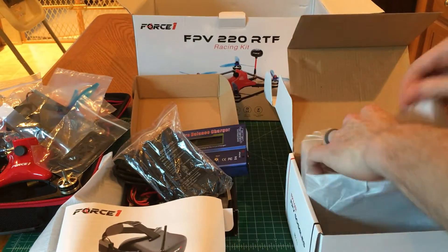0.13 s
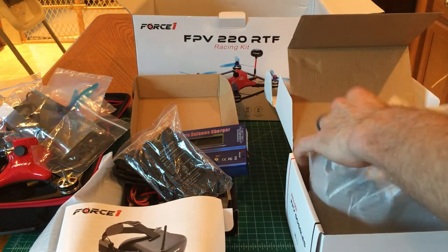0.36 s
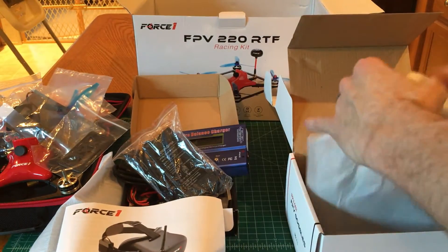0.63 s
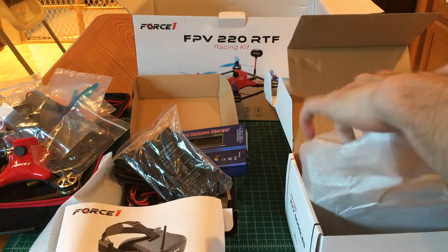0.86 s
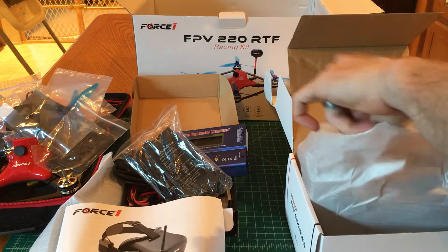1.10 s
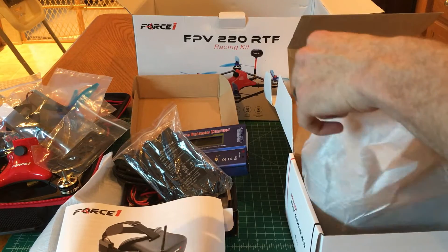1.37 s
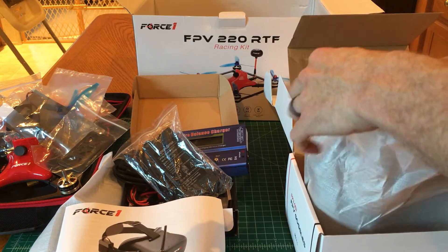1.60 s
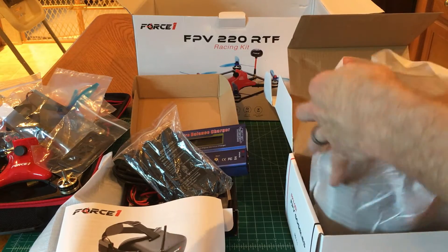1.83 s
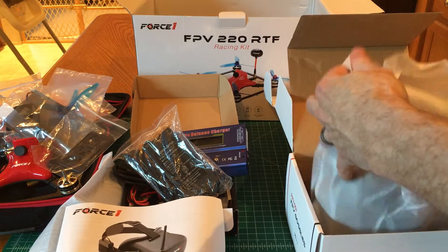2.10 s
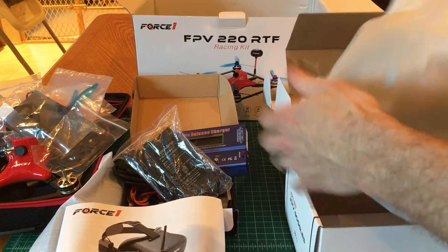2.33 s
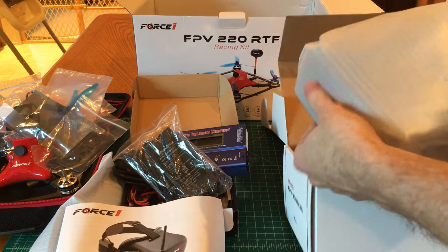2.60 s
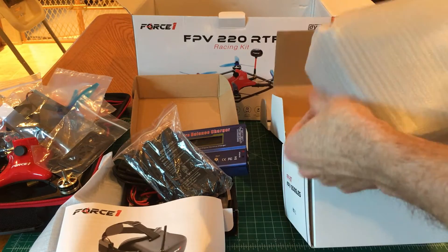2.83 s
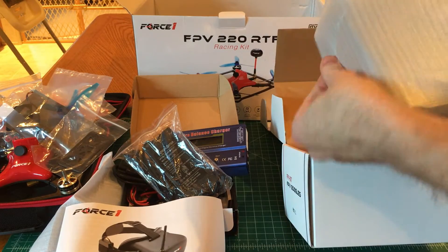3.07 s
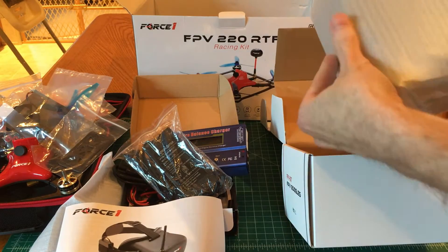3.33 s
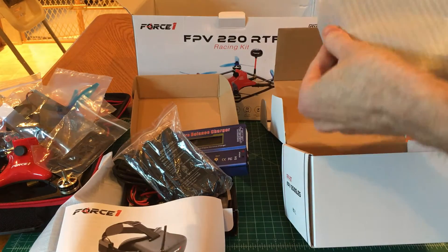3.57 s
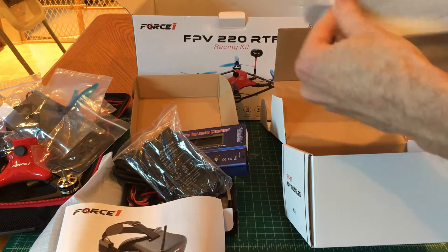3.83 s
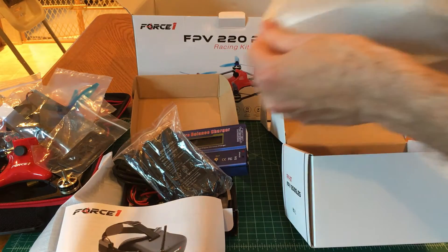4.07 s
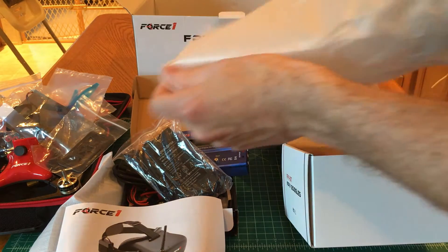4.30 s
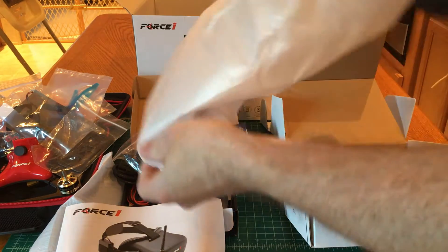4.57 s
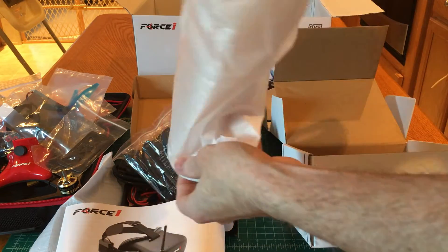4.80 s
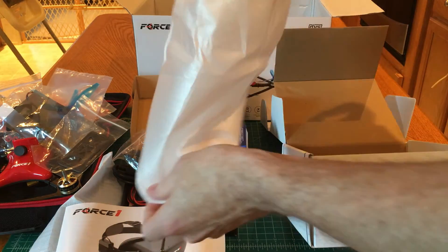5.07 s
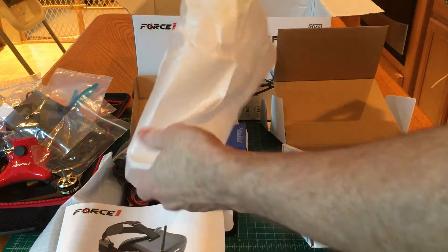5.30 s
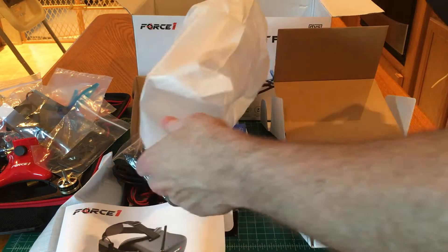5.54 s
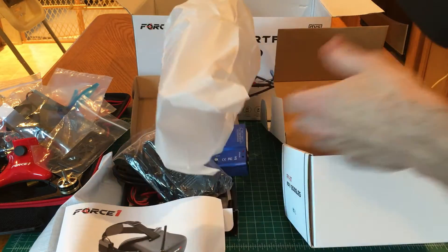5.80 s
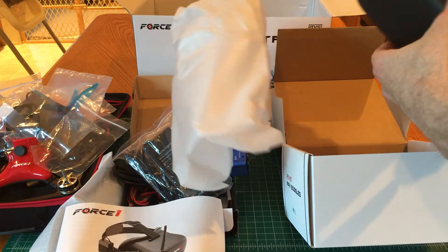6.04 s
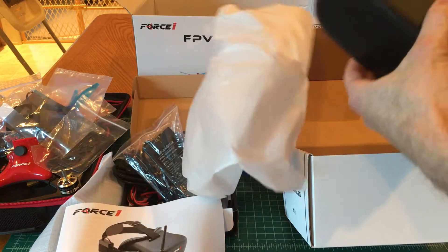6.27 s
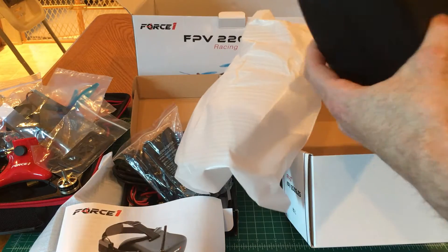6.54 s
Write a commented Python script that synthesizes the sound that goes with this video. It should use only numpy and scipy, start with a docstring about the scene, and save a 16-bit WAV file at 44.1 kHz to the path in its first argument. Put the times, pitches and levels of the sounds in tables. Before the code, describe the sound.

A quiet small room with a low steady hum and soft murmur, heard through one close microphone with a short dull echo. From 0 to 2.3 s, hands rub thin foam wrapping in short, gritty, airy strokes of about a tenth to a quarter second, with small crease pops and muffled cardboard bumps. After a brief lull, a pop and light knock come at 2.4 s, then at about 2.7 s the box drops on the table with a loud hollow double knock, rattling and tapping quickly to rest by 2.9 s. Gentler rustles continue. From 3.9 s they strengthen, peaking near 4.1 s with a sharp, loud crease snap, a knock and a fuller swish lasting to 4.5 s. Then only short faint rubs and tiny ticks remain, nearly silent around 5.6 to 6 s, with a small cluster of crinkles near 6.2 to 6.3 s and a last tick at 6.6 s.

```python
"""A thin foam sheet slides under the hands in short strokes and its creases pop, close to a single microphone.
The hands are lifting an object wrapped in the sheet from a cardboard box in a quiet room, over a hum and a low murmur.
The sheet is gritty noise in drifting bands, a pop is a sagging tone with a crack, and rubs and knocks ring
the box's modes as it drops back on the table and rocks. The hum is wavering sines; the walls add a dull noise-tail echo."""
import sys
import numpy as np
from scipy import signal
from scipy.fft import rfft, irfft, next_fast_len
from scipy.io import wavfile
from scipy.ndimage import uniform_filter1d

SR = 44100
rng = np.random.default_rng(int(sys.argv[2]) if len(sys.argv) > 2 else 0)


def log_audio(samples):
    """Write samples as a 16-bit WAV file to the path given in sys.argv[1]."""
    # one column per channel
    frames = np.atleast_2d(samples).T
    # limit to full scale, then quantise
    limited = np.clip(frames, -1, 1)
    pcm = np.round(limited * 32767).astype(np.int16)
    wavfile.write(sys.argv[1], SR, pcm)


def makeup_ratio(level_db):
    """Linear amplitude ratio for a level in decibels (20 dB per factor of ten)."""
    decades = np.asarray(level_db, float) / 20
    return 10 ** decades


N = 293526
T = np.arange(N) / SR

# strokes of the sliding sheet: (start t/s, length/s, starting level/dB, sag over the stroke/dB,
# sheen level against the stroke/dB)
SHEET_STROKES = [(0, 0.017, -44.5, -3, -9), (0.107, 0.09, -35.5, 9.5, -6.5), (0.211, 0.16, -35, 0.7, -6),
                 (0.436, 0.24, -37.5, 1, -6.5), (0.72, 0.083, -39, 5.5, -4.5),
                 (0.887, 0.208, -36.5, 0, -4.5), (1.132, 0.17, -41.5, 0.5, -1),
                 (1.344, 0.05, -49.5, -6, -5), (1.405, 0.03, -48, 2, -4), (1.547, 0.011, -38.5, 15, -18),
                 (1.578, 0.07, -40.5, 2, -6), (1.72, 0.13, -47, -5.5, -4.4), (1.883, 0.27, -38.5, 4, -8),
                 (2.199, 0.11, -36, 16.5, -5), (2.297, 0.032, -53.5, -1, -4),
                 (2.387, 0.0082, -47.5, -6.5, -5), (2.467, 0.025, -45, -11.5, -9.5),
                 (2.585, 0.058, -40, 5, -5), (2.669, 0.11, -46, -6, -2), (2.902, 0.052, -42, -4.5, -6),
                 (3.007, 0.11, -43.5, -0.5, 0.5), (3.126, 0.12, -45, -3.8, -10),
                 (3.34, 0.11, -37.5, 3.9, -4), (3.661, 0.093, -45, -7, -9), (3.785, 0.056, -38, -8, -9),
                 (3.901, 0.044, -34, -3.5, -4), (4.022, 0.065, -32, -0.5, -8),
                 (4.077, 0.24, -28.5, 4.5, -6), (4.352, 0.18, -40.0, 7, -2.5), (4.577, 0.1, -48.5, 0.3, -6),
                 (4.74, 0.015, -51, 6, -10), (4.782, 0.018, -49, 5, -10), (4.859, 0.01, -46, 20, -6),
                 (4.925, 0.03, -57, -8.5, -4.8), (5.027, 0.023, -45, 4.5, -1.5), (5.221, 0.072, -47, 1, -3),
                 (5.391, 0.0099, -45.5, -1.5, -7), (5.61, 0.08, -62.5, -1, -12), (6.135, 0.008, -60, 9, -6),
                 (6.164, 0.065, -57, -6, -7), (6.26, 0.015, -47.9, 10, -7), (6.296, 0.067, -63.5, -6.6, -8),
                 (6.43, 0.041, -50, 3, -5), (6.558, 0.073, -65.5, -12, -9)]
# the sheet resting in the hands between strokes: (t/s, level/dB)
RESTING_CONTACT = [(0, -50), (1.2, -42.5), (1.5, -46.5), (2.3, -62), (2.36, -66), (2.55, -49.5), (3.3, -48),
                   (3.62, -51.5), (4.72, -60), (4.9, -56.5), (5.15, -54.5), (5.5, -58), (5.58, -64),
                   (5.9, -67), (6.1, -63.5), (6.3, -60.5), (6.66, -64)]
# spectrum of the sheet as the microphone hears it, with the microphone's dips near 2.9, 5 and 10.4 kHz,
# relative within each of its four bands: (f/Hz, density/dB)
SHEET_SPECTRUM = [(240, -44), (500, -5), (800, -6.5), (1200, -3.5), (2400, -1.5), (2900, -14), (4440, -8),
                  (5000, -11), (6400, 3.5), (7600, 1), (8600, 2.5), (9900, -1.5), (10400, -5.5),
                  (11200, -0.5), (16000, -5.5)]
# the sheet's two lower bands against the rubbing level, before firmness: (t/s, body level/dB, fold level/dB)
LOW_BANDS = [(0, -2, -6), (.3, -5, -6.5), (.6, -4.5, -5.5), (.9, -6.5, -8), (1.25, -8.5, -7.5),
             (1.4, -5, -7), (1.9, -4.5, -5.5), (2.4, -6, -6), (2.75, -5, -5.5), (3.1, -8, -8.5),
             (3.42, -4, -7.5), (3.9, -6.5, -6.5), (4.2, -1.5, -7), (4.6, -7, -7), (5.05, -7.5, -7.5),
             (5.4, -8, -6), (5.55, -8, -9.5), (6.0, -8, -8.5), (6.3, -5.5, -5), (6.66, -8, -7.5)]
# hands and load shuffling against the box, before a 1.5 dB trim: (t/s, level/dB)
BOX_SHUFFLE = [(0.0, -46), (0.81, -50), (1.04, -49), (1.32, -52), (1.83, -48.5), (2.45, -52.5), (2.65, -50),
               (2.98, -58), (3.87, -50.5), (4.23, -39), (4.39, -46), (4.67, -57.5), (4.87, -57),
               (5.04, -54.5), (5.69, -52.5), (5.84, -54.5), (6.32, -58), (6.66, -56.5)]
# cardboard walls as ringing modes, as struck; shuffling halves the t60: (f/Hz, relative level/dB, t60/s)
BOX_MODES = [(92, -9, 0.14), (172, -9.5, 0.19), (230, -9.5, 0.11), (301, 0.5, 0.062), (357.4, 0, 0.054),
             (437, -2, 0.045), (556, -9.5, 0.045), (636, -3.5, 0.095), (722, -0.5, 0.054), (896, 5, 0.027),
             (1110, 4.5, 0.042), (1266, 0.5, 0.036), (1340, -4, 0.028), (1710, -4, .04), (2120, -2, 0.056),
             (3270, -2, 0.026)]
# relative spectrum of the room's murmur: (f/Hz, density/dB)
ROOM_SPECTRUM = [(18, -37), (30, -7), (59, 3), (124, -5.5), (233, 0), (404, -14.5), (1190, -22.5),
                 (1320, -37), (2480, -32.5), (2900, -42), (3400, -31), (9220, -48.5), (16000, -47)]
# lines of the hum, before a 3.5 dB lift: (f/Hz, level/dB)
HUM_LINES = [(59.2, -57.5), (177.6, -60.5), (231.5, -61), (1174, -76), (1464, -84), (1933, -76.5),
             (2460, -75.5), (2519, -86)]
# creases popping: (t/s, patch peak level/dB, nominal f/Hz, crack peak against patch/dB, ring t60/s)
CREASE_POPS = [(.018, -27, 1620, -2, 0.035), (.1165, -36, 1460, -5, .02), (.3685, -25, 2160, -9, 0.016),
               (0.595, -25, 1856, -18, 0.04), (0.6009, -23, 1430, -22, 0.021), (.728, -28, 2160, -8, .014),
               (.7765, -24.5, 1670, -8, 0.017), (1.615, -34, 1130, -10, 0.024),
               (2.3986, -23.5, 1830, -3.5, 0.016), (2.496, -26, 1504, -12.5, 0.048),
               (2.6775, -22, 2350, -7, 0.016), (2.7015, -38, 2260, -10, .013),
               (3.9152, -29.5, 1740, -3, 0.022), (4.069, -24, 2080, -20, .0115),
               (4.072, -11.5, 1086, 7, 0.031), (4.0715, -12, 2250, -20, 0.014),
               (4.1763, -26.5, 990, -6, 0.018), (4.247, -24, 2307, 4.5, .015), (4.33, -30, 970, -8, 0.032),
               (5.275, -40, 2310, -20, .041), (5.288, -37, 2310, -20, 0.027), (5.385, -42, 2600, 2, .015),
               (5.4032, -36, 2220, -2, .015), (5.4903, -42, 1900, 0, .015), (6.066, -55, 3000, 9, .015),
               (6.2055, -39, 1110, -8, .018), (6.215, -38, 1860, -1, 0.024), (6.253, -38, 1710, -1, 0.019),
               (6.282, -43, 10500, -20, .02), (6.3, -35, 1800, 0, 0.018), (6.611, -37.5, 3950, -8, 0.018)]
# blows on the box: (t/s, peak level/dB, most stirred f/Hz, focus/dB per octave, rattle decay to 1/e /ms)
BOX_KNOCKS = [(.11, -38, 229, 10, 4.7), (.224, -31.5, 331, 13, 3.3), (.502, -38, 326, 18, 2.9),
              (.603, -25.5, 367, 9, 1.7), (.73, -30, 383, 9, 4.2), (.777, -32.5, 318, 10, 9.1),
              (.987, -27, 230, 5.5, 2.2), (1.384, -34.5, 304, 22, 3.3), (1.611, -28, 260, 7, 2.2),
              (2.006, -33, 229, 12, 3.3), (2.323, -35, 304, 6, 3.4), (2.384, -32, 300, 5, 3.5),
              (2.399, -22, 440, 36, 1), (2.493, -30, 250, 15, 3.7), (2.678, -11.5, 495, 4.5, 9.8),
              (2.703, -15.5, 704, 6, 5.3), (2.721, -20, 900, 2.5, 14), (4.078, -19.5, 307, 1.5, 1.66),
              (4.33, -29, 740, 8, 5.2), (5.429, -40, 231, 2.5, 1.4), (6.257, -37.5, 300, 8, 2.5),
              (6.3, -34, 700, 10, 1.1)]

# sheet: body lies below the first edge, then fold, the main band, and sheen above the last
BODY_BELOW_HZ, FOLD_BELOW_HZ, SHEEN_ABOVE_HZ = 2850, 5000, 10500
RISE_DB_PER_S, FALL_DB_PER_S, REST_SHEEN_DB = 613, 257, -6
# gentler rubbing is duller: body and fold recede per dB of rubbing above FIRM_DB
FIRM_DB, BODY_PER_DB, FOLD_PER_DB = -46, 0.4059, 0.18
ECHO_T60_S, ECHO_DB, ECHO_TOP_HZ = 0.41, -16, 4800
# cracks harder than SHARP_ABOVE_DB decay faster than CRACK_MS
CRACK_MS, SHARP_ABOVE_DB = 2, -18
# after the drop the box rocks to rest: each tap is weaker, and lower until ROCK_LOW_HZ
ROCK_S, ROCK_GAP_S, ROCK_DB, ROCK_DB_PER_TAP = 2.745, .023, -30, 1.7
ROCK_HZ, ROCK_LOW_HZ, ROCK_OCTAVES_PER_TAP = 900, 440, 0.56
ROCK_FOCUS_DB, ROCK_MS = 23, 7.7  # focus per octave
TOP_HZ = 15720  # upper edge of the microphone's range


def unit(x):
    """Scale to rms 1."""
    return x / np.sqrt(np.mean(x ** 2))


def colour(x, points):
    """Shape a noise by (Hz, dB) points, joined along log frequency."""
    hz, db = np.transpose(points)
    bins = np.arange(N // 2 + 1) * SR / N + 1
    gain_db = np.interp(np.log(bins), np.log(hz), db)
    return irfft(rfft(x) * makeup_ratio(gain_db), N)


def cut(x, hz, kind):
    """Steep low-, high- or band-pass."""
    return signal.sosfilt(signal.butter(4, hz, kind, fs=SR, output="sos"), x)


def ring(hz, t60, size=6000):
    """One mode dying away by 60 dB in t60 seconds."""
    t = np.arange(size) / SR
    return np.sin(2 * np.pi * hz * t) * np.exp(-np.log(1000) * t / t60)


def add(out, s, sound):
    """Mix a sound in at time s."""
    i = int(s * SR)
    out[i:i + len(sound)] += sound[:N - i]


def walk(rate):
    """Random levels held 1 / rate seconds and slewed twice; rms 1."""
    k = int(SR / rate)
    held = np.repeat(rng.standard_normal(N // k + 1), k)
    slewed = uniform_filter1d(uniform_filter1d(held, k), k)
    return unit(slewed[:N])


def grit(share, spread_db, grit_db):
    """Smooth rubbing plus scattered cells that catch and let go with uneven strength, a few somewhat harder."""
    caught = rng.random(N) < share
    strength = makeup_ratio(spread_db * rng.exponential(size=N))
    catches = caught * strength * rng.standard_normal(N)
    return unit(rng.standard_normal(N) + makeup_ratio(grit_db) * unit(catches))


def strokes():
    """Level and sheen of the rubbing: strokes share one rise and fall rate, over the resting contact."""
    power = makeup_ratio(2 * np.interp(T, *np.transpose(RESTING_CONTACT)))
    sheen = power * REST_SHEEN_DB
    for s, length, db, sag_db, sheen_db in SHEET_STROKES:
        level_db = db - sag_db * np.clip((T - s) / length, 0, 1)
        level_db -= RISE_DB_PER_S * np.clip(s - T, 0, 1)
        level_db -= FALL_DB_PER_S * np.clip(T - s - length, 0, 1)
        stroke = makeup_ratio(2 * level_db)  # power
        power = power + stroke
        sheen = sheen + stroke * sheen_db
    return 10 * np.log10(power), sheen / power


def patches(rub, flicker_db, crackle_db):
    """Patches of film come and go under the fingers: quarter-octave bands swell and crackle on their own."""
    size = next_fast_len(N)
    step = 4 * np.log2((np.arange(size // 2 + 1) * SR / size + 1) / 200)  # quarter octaves above 200 Hz
    out = np.zeros(N)
    for k in range(27):
        ticks = unit((rng.random(N) < .008) * rng.standard_normal(N))
        window = np.cos(np.pi / 2 * np.clip(step - k, -1, 1)) ** 2  # neighbours overlap and sum to one
        band = irfft(rfft(rub + makeup_ratio(crackle_db) * ticks, size) * window, size)[:N]
        out += makeup_ratio(flicker_db * walk(14)) * band
    return out


def sheet():
    """Stick-slip rubbing of foam film; body and fold recede as the grip firms, sheen changes with each stroke."""
    db, sheen_db = strokes()
    s, body_db, fold_db = np.transpose(LOW_BANDS)
    body_db = np.interp(T, s, body_db) - BODY_PER_DB * (db - FIRM_DB)
    fold_db = np.interp(T, s, fold_db) - FOLD_PER_DB * (db - FIRM_DB)
    rub = grit(share=.03, spread_db=1.5, grit_db=-6.5)
    rub = rub * makeup_ratio(1.3 * walk(60) + 0.68 * walk(25.12))
    rub = colour(patches(rub, flicker_db=1.1, crackle_db=-7.5), SHEET_SPECTRUM)
    body = makeup_ratio(body_db) * unit(cut(rub, BODY_BELOW_HZ, "low"))
    fold = makeup_ratio(fold_db) * unit(cut(rub, (BODY_BELOW_HZ, FOLD_BELOW_HZ), "band"))
    main = makeup_ratio(-4.5) * unit(cut(rub, (FOLD_BELOW_HZ, SHEEN_ABOVE_HZ), "band"))
    sheen = makeup_ratio(sheen_db) * unit(cut(rub, SHEEN_ABOVE_HZ, "high"))
    return makeup_ratio(db) * (body + fold + main + sheen)


def shuffling():
    """Hands and load bump along the cardboard and ring its modes, which die twice as fast as when struck."""
    walls = sum(makeup_ratio(db) * ring(hz, t60 * 0.5) for hz, db, t60 in BOX_MODES)
    bumps = cut(grit(share=.004, spread_db=2.5, grit_db=-3.0), 535, "low")
    rubbed = unit(signal.fftconvolve(bumps, walls)[:N])
    s, db = np.transpose(BOX_SHUFFLE)
    return makeup_ratio(np.interp(T, s, db) - 1.5) * rubbed


def murmur():
    """Low coloured noise of the room that swells a little."""
    noise = unit(colour(rng.standard_normal(N), ROOM_SPECTRUM))
    return makeup_ratio(-50.5 + 1.2 * walk(2.65)) * noise


def hum():
    """Appliance motor as steady lines that waver in level and slightly in pitch."""
    out = np.zeros(N)
    for hz, db in HUM_LINES:
        level = makeup_ratio(db + 3.5 + 1.94 * walk(5))
        wavering_time = np.cumsum(1 + .004 * walk(4)) / SR
        out += level * np.sin(2 * np.pi * hz * wavering_time)
    return out


def echo(x):
    """Dense, dull reflections from the walls that start after 4 ms and die away."""
    t = np.arange(int(1.3 * ECHO_T60_S * SR)) / SR
    tail = cut(rng.standard_normal(len(t)), ECHO_TOP_HZ, "low")
    tail = tail * np.exp(-np.log(1000) * t / ECHO_T60_S) * (t > .004)
    tail = tail / np.sqrt(np.sum(tail ** 2))
    return makeup_ratio(ECHO_DB) * signal.fftconvolve(x, tail)[:N]


def pops():
    """A buckling crease rings a patch of film whose pitch sags as it slackens, and cracks broadly."""
    out = np.zeros(N)
    t = np.arange(1500) / SR
    for s, db, hz, crack_db, t60 in CREASE_POPS:
        noise = rng.standard_normal(len(t))
        # pitch sags within a few cycles from about 1.27 to 0.835 of nominal
        turns = 0.835 * hz * t + 1.31 * (1 - np.exp(-hz * t / 3.0))
        fade = (1 - np.exp(-t / .0003)) * np.exp(-np.log(1000) * t / t60)
        rough = unit(cut(noise, (hz * 0.33, hz * 1.73), "band"))
        patch = fade * (np.sin(2 * np.pi * turns) + 0.46 * rough)
        ms = CRACK_MS * makeup_ratio(-0.8 * max(db + crack_db - SHARP_ABOVE_DB, 0))
        crack = (noise + 2.9 * (t == 0)) * np.exp(-1000 * t / max(ms, .1))  # led by one sharp edge
        crack = cut(crack, (4000, 11500), "band")
        add(out, s, makeup_ratio(db) * patch / np.abs(patch).max())
        add(out, s, makeup_ratio(db + crack_db) * crack / np.abs(crack).max())
    return out


def rocking(count=6):
    """Evenly spaced blows, in the columns of BOX_KNOCKS, for the box rocking to rest."""
    rows = []
    for k in range(count):
        hz = max(ROCK_HZ / 2 ** (k * ROCK_OCTAVES_PER_TAP), ROCK_LOW_HZ)
        db = ROCK_DB - k * ROCK_DB_PER_TAP
        rows.append((ROCK_S + k * ROCK_GAP_S, db, hz, ROCK_FOCUS_DB, ROCK_MS))
    return rows


def knocks():
    """Blows ring the cardboard modes; loose flaps make every blow a short rattle."""
    out = np.zeros(N)
    t = np.arange(2000) / SR
    for s, db, hz, focus_db, ms in BOX_KNOCKS + rocking():
        # modes far from the struck panel's own pitch are stirred less
        walls = sum(makeup_ratio(mode_db - focus_db * abs(np.log2(f / hz))) * ring(f, t60)
                    for f, mode_db, t60 in BOX_MODES)
        push = 0.26 * rng.standard_normal(len(t)) * np.exp(-1000 * t / max(ms, .2))
        push[0] = 1  # the first contact, ahead of the rattle
        blow = cut(signal.fftconvolve(walls, push), 87, "high")  # a small box radiates little deep bass
        add(out, s, makeup_ratio(db) * blow / np.abs(blow).max())
    return out


def scene():
    """Close sources with their echo, over the room; one microphone feeds both channels."""
    near = sheet() + shuffling() + pops() + knocks()
    mono = near + echo(near) + murmur() + hum()
    return np.tile(mono, (2, 1))


def band_limit(x):
    """A steep low-pass at the top of the band."""
    return signal.sosfilt(signal.butter(12, 16620, fs=SR, output="sos"), x)


def record(dry):
    """The microphone drops the deepest bass and the top is cut steeply."""
    mic = cut(dry, 48, "high")
    mic = signal.sosfilt(signal.ellip(14, .5, 70, TOP_HZ, fs=SR, output="sos"), mic)
    return band_limit(mic)


dry = scene()
out = record(dry)
log_audio(out)
```